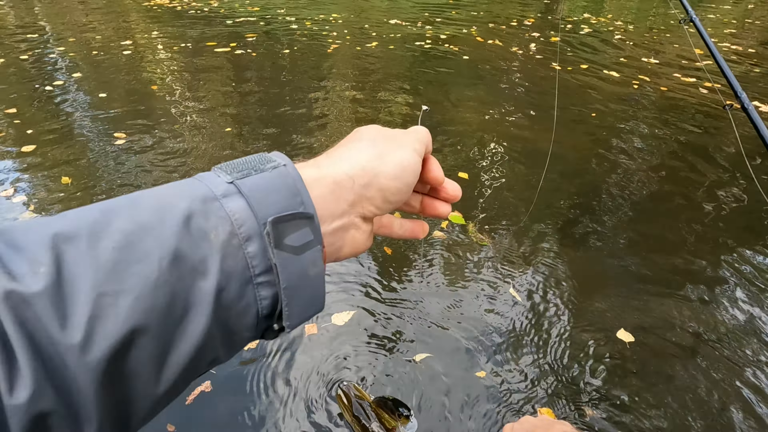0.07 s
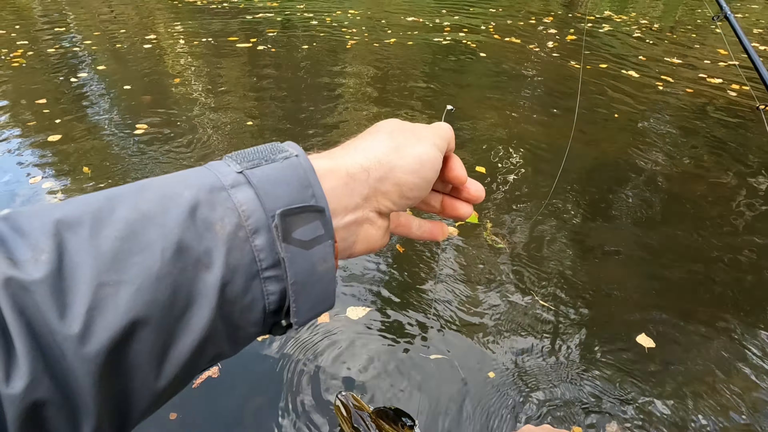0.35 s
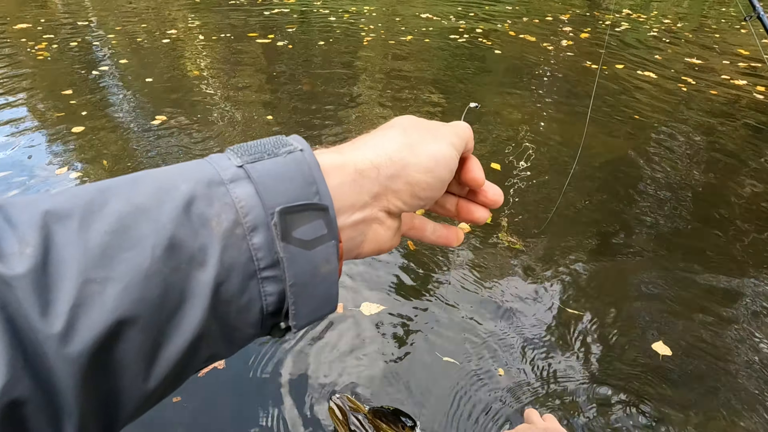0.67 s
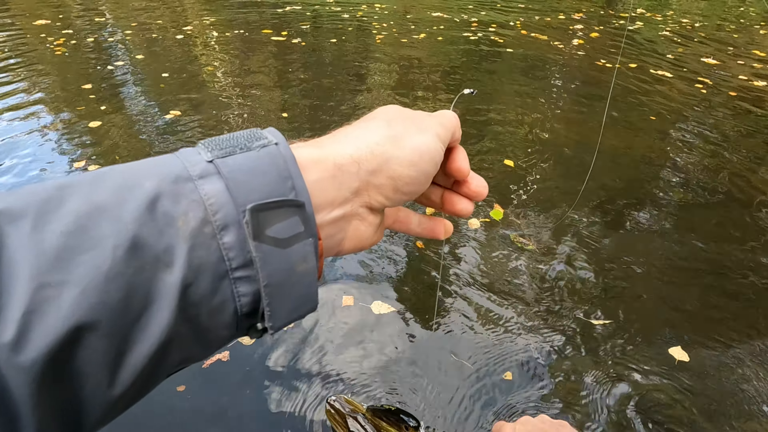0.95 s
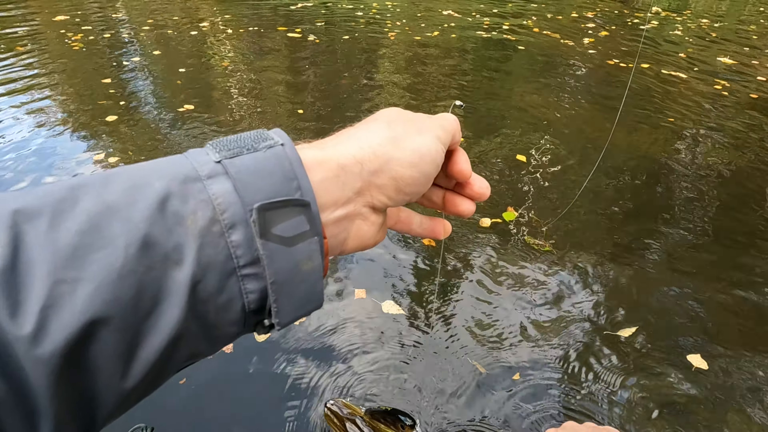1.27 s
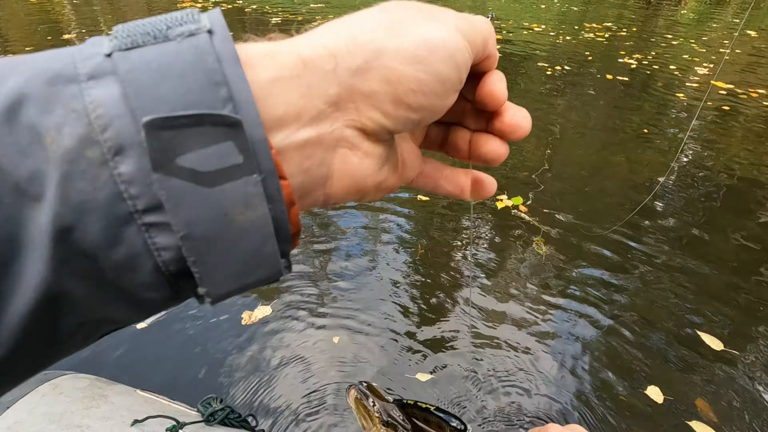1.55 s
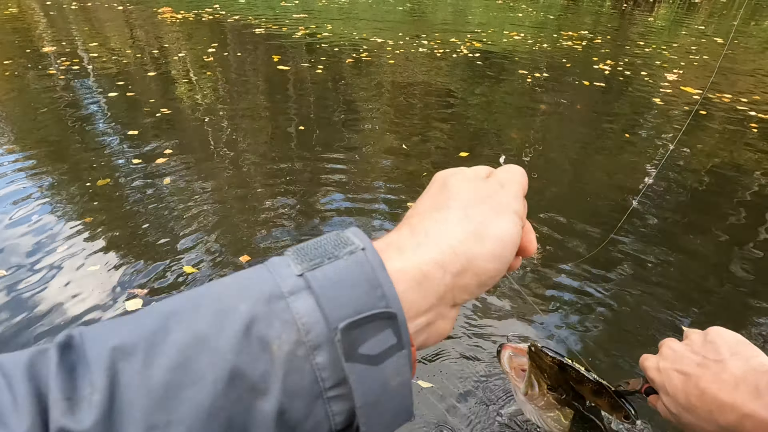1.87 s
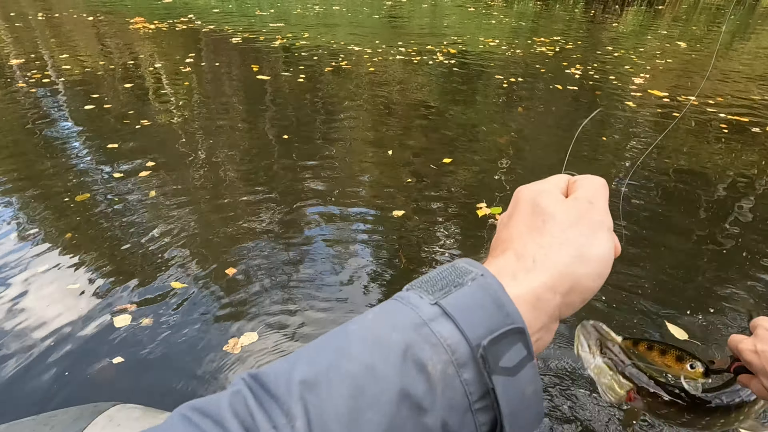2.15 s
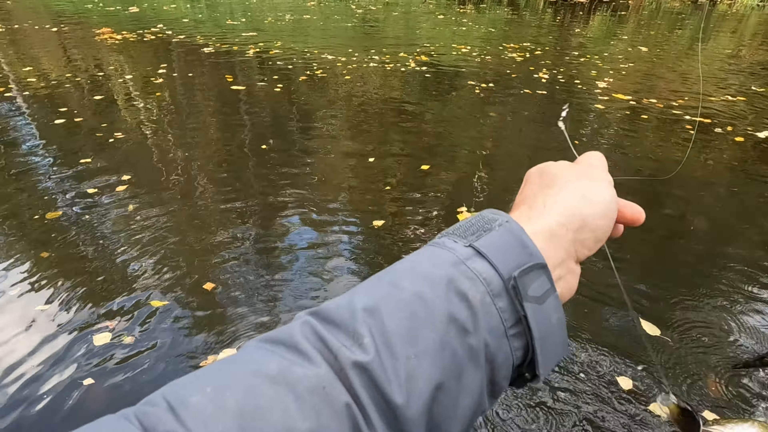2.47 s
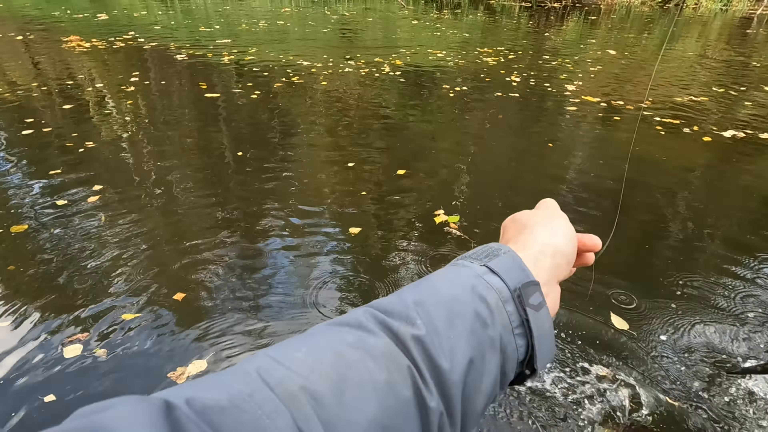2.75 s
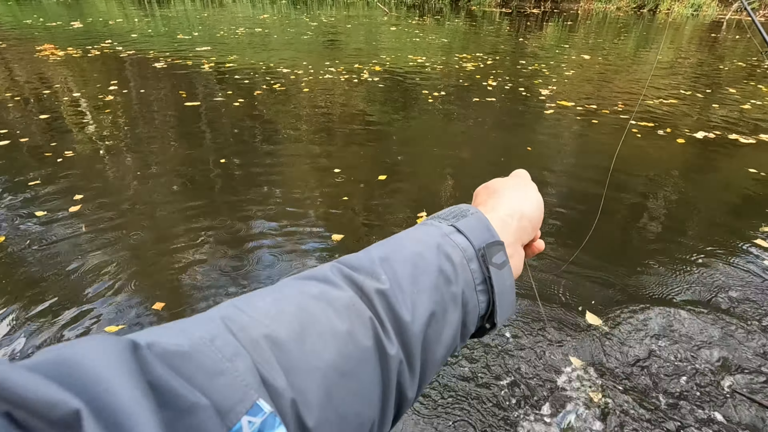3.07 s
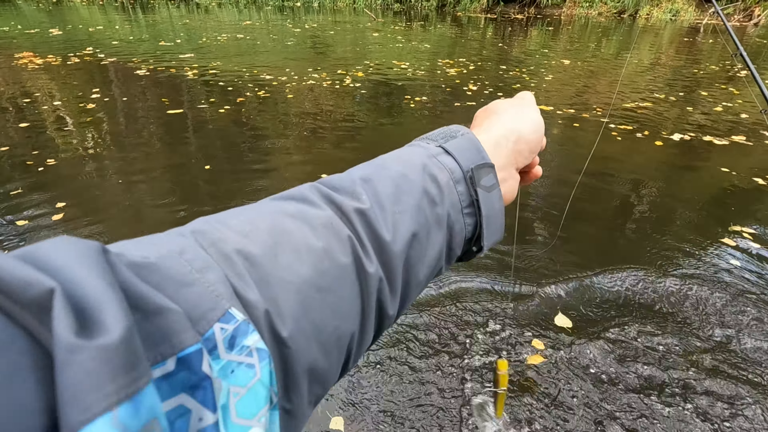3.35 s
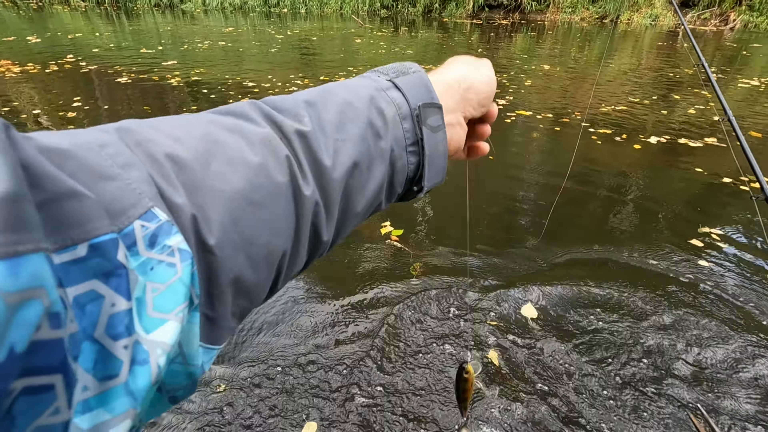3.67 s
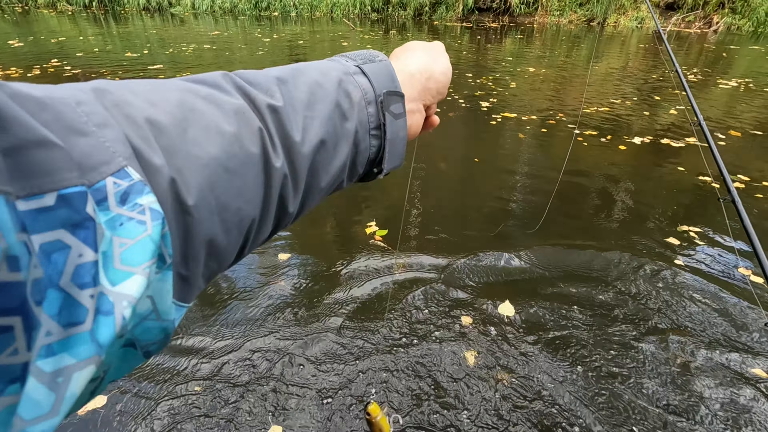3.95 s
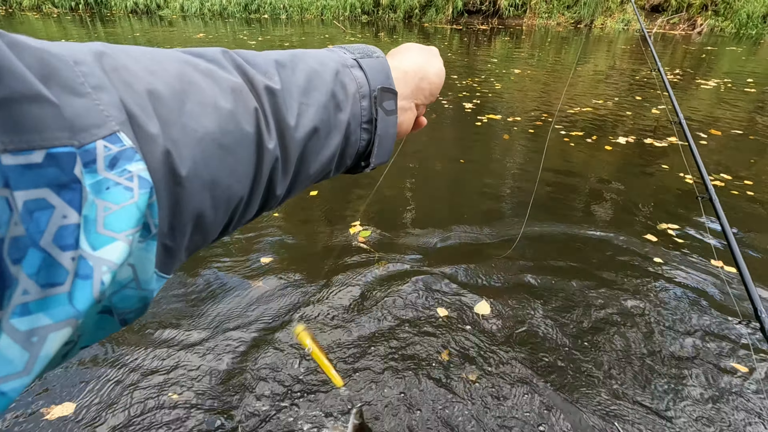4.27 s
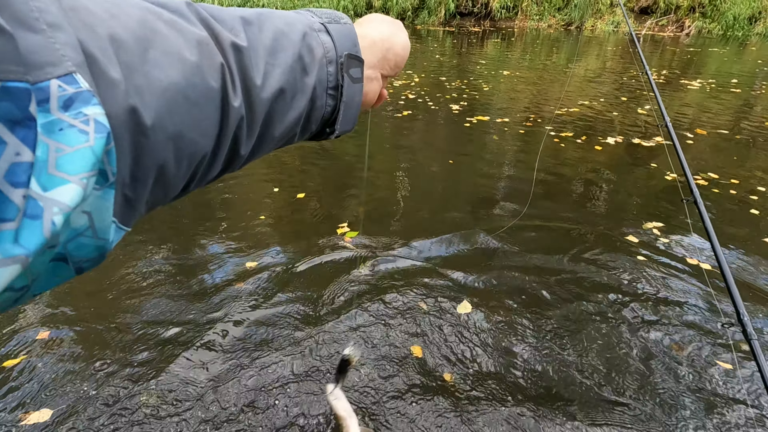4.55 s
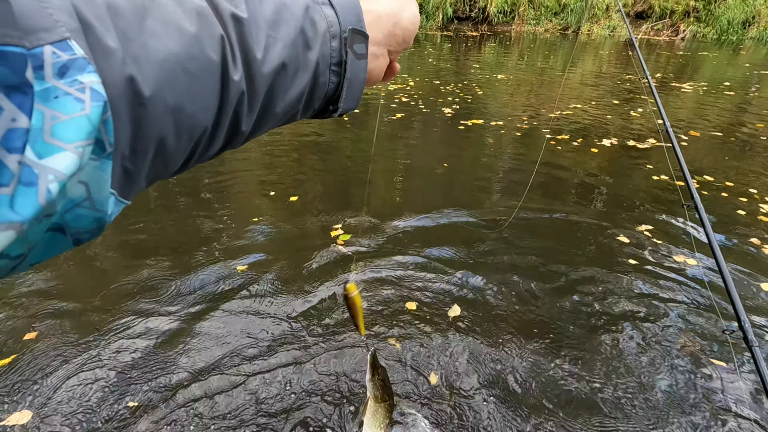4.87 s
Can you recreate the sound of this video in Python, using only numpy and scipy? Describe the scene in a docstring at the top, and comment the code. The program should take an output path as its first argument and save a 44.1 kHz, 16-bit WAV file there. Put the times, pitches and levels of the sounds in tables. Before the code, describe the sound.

Light wind rumbles and puffs on the microphone over a faint hiss on a quiet river. In the first second there are soft rubs of fishing gear and two faint low groans, then a dull knock on an inflatable boat at about 1.4 seconds. From around 2 seconds a small hooked fish thrashes at the surface close by. Its tail and fins flick, slice and slap the water, bubbles plop and gurgle, and spray patters back. More dull knocks on the hull come at about 3.2 and 3.6 seconds. The splashing dies down just after 5 seconds, and a soft swell washes along the boat near 5.8 seconds. A few small flicks return from 6.5 seconds and build into a second bout of splashing from about 7.5 to 8.5 seconds, with a light gust of wind near 8 seconds.

```python
"""First comes light wind rumbling on the microphone, over a faint hiss, soft rubs and a few dull knocks
on an inflatable boat on a quiet river. Then a small hooked fish thrashes at the surface beside it.
Its tail and fins flick, slice and slap the water, trapped air rings as rising bubbles, and spray
patters back. Between the bouts a soft swell washes along the boat."""
import sys
import numpy as np
from scipy import signal
from scipy.fft import rfft, irfft, next_fast_len
from scipy.io import wavfile
from scipy.ndimage import uniform_filter1d

SR = 44100
rng = np.random.default_rng(int(sys.argv[2]) if len(sys.argv) > 2 else 0)


def pcm_store(signal):
    """Save signal as 16-bit PCM."""
    levels = np.round(np.clip(np.atleast_2d(signal), -1, 1) * 32767)
    wavfile.write(sys.argv[1], SR, levels.astype(np.int16).T)


N = 379195
TIME = np.arange(N) / SR
SURGE_HZ = 45  # stirred water comes in uneven surges, up to this fast


def amp(db):
    """Turns decibels into a gain to multiply by."""
    return 10 ** (np.asarray(db) / 20)


def unit(x):
    """Scales a signal to an average strength (rms) of 1."""
    return x / np.sqrt(np.mean(x ** 2) + 1e-20)


def steady(x, span_s):
    """Evens out a signal so that its strength stays near 1."""
    return x / np.sqrt(abs(uniform_filter1d(x ** 2, max(int(span_s * SR), 2))) + 1e-12)


def colour(x, points, power=1):
    """Turns lows and highs up or down along a curve of (frequency [Hz], level [dB]) points."""
    hz, db = np.transpose(points)
    size = next_fast_len(len(x) + 4096)
    gain = amp(power * np.interp(np.log(np.fft.rfftfreq(size, 1 / SR) + 1), np.log(hz), db))
    return irfft(rfft(x, size) * gain, size)[:len(x)]


def band(x, hz, octaves):
    """Keeps only the frequencies around hz."""
    edges = np.clip([hz / 2 ** (octaves / 2), hz * 2 ** (octaves / 2)], [10, 20], [SR * .4, SR * .48])
    return signal.sosfilt(signal.butter(2, edges, "band", fs=SR, output="sos"), x)


def curve(rows):
    """Joins (time [s], level [dB]) points into a gain that changes over time."""
    return amp(np.interp(TIME, *np.transpose(rows)))


def add(mix, s, sound):
    """Mixes a sound in, starting at s seconds."""
    part = mix[..., max(round(s * SR), 0):][..., :sound.shape[-1]]
    part += sound[..., :part.shape[-1]]


def bout(start, length, attack_s=0.0092, release_s=0.046):
    """A gain that swells, holds and dies away."""
    t = TIME - start
    return np.clip(t / attack_s, 0, 1) * np.exp(-np.maximum(t - length, 0) / release_s)


def wander(rate_hz, count=24):
    """A random drift of strength 1, no faster than rate_hz."""
    t = TIME[::200]
    hz = np.geomspace(rate_hz / 10, rate_hz, count)
    waves = np.sin(2 * np.pi * (hz * t[:, None] + rng.random(count)))
    return np.interp(TIME, t, unit(waves.sum(1)))


def puff(hz, octaves, decay_s, attack=0.063):
    """A burst of noise around hz that swells to a strength of about 1 and dies away."""
    t = np.arange(SR // 4) / SR
    fade = (1 - np.exp(-t / (attack * decay_s))) * np.exp(-t / decay_s)
    burst = unit(band(rng.standard_normal(len(t)) * fade, hz, octaves))
    return burst * np.sqrt(np.mean(fade ** 2)) / fade.max()


def bubble(hz, life_s, rise, rough=0, wobble=0.11, damping=1.1):
    """Trapped air rings, gliding by rise octaves as it nears the surface; churned water makes it waver."""
    age = np.arange(0, 1, 1 / max(life_s * SR, 8))
    jitter = unit(uniform_filter1d(rng.standard_normal((2, SR // 8)), size=110))
    bend, flutter = rough * jitter[:, :len(age)]
    turns = np.cumsum(hz * 2 ** (rise * age ** 2) * (1 + wobble * bend)) / SR
    fade = (1 - np.exp(-2 * turns)) * np.exp(-damping * age) * (1 - age ** 4)
    return np.sin(2 * np.pi * turns) * (1 + flutter) * fade


# how the microphone dulls high sounds: (frequency [Hz], level [dB])
MIC_TREBLE = [(7000, 0), (9200, -4.5), (10700, -12.5), (12400, -6.5), (14000, -22.5), (16000, -26)]


def microphone(pair):
    """The microphone softens the treble on both sides."""
    return np.array([colour(side, MIC_TREBLE) for side in pair])


# how wide the sound spreads: (frequency [Hz], scatter level [dB])
STEREO_WIDTH = [(100, -23), (300, -20), (700, -15), (1400, -9.5), (2800, -7.5), (5500, -8.5), (9000, -10.5),
                (13000, -2.5)]
# how much louder the left side is: (frequency [Hz], left minus right [dB])
LEFT_LOUDER = [(200, 0), (1000, -.4), (2300, -1.8), (4600, -1.4), (8500, 1.8), (13000, 4.5)]
# how far the left side runs ahead, negative for behind: (frequency [Hz], phase [radians])
LEFT_AHEAD = [(0, 0), (500, -.05), (1300, -.3), (2600, -.75), (5700, -.2), (12000, 0)]


def mic_openings(pair, size=256):
    """Two close openings hear the same bass but differently scattered treble, the left a bit later."""
    spectra = signal.stft(pair.mean(0), nperseg=size)[2]
    scatter = signal.istft(spectra * np.exp(2j * np.pi * rng.random(spectra.shape)), nperseg=size)[1][:N]
    side = colour(np.sqrt(2) * scatter, STEREO_WIDTH)
    both = np.array([colour(pair[0] + side, LEFT_LOUDER, .5), colour(pair[1] - side, LEFT_LOUDER, -.5)])
    padded = next_fast_len(N)
    lead = np.interp(np.fft.rfftfreq(padded, 1 / SR), *np.transpose(LEFT_AHEAD))
    return irfft(rfft(both, padded) * np.exp(.5j * np.array([lead, -lead])), padded)[:, :N]


def echoes(x, boat_db=-15, boat_s=0.0035, bank_db=-27, bank_s=0.009):
    """Sound bounces quickly off the boat and the water, and faintly off the banks."""
    t = np.arange(SR // 2) / SR
    echo = np.zeros(len(t))
    for db, decay_s in (boat_db, boat_s), (bank_db, bank_s):
        tail = band(rng.standard_normal(len(t)), hz=3740, octaves=5.6) * np.exp(-t / decay_s) * (t > .003)
        echo += amp(db) * tail / np.linalg.norm(tail)
    return signal.oaconvolve(x, echo)[:N]


# tone of the hiss in the opening lull, then afterwards: (frequency [Hz], level [dB])
EARLY_HISS = [(100, -4), (220, 0), (400, -4), (700, -9), (1200, -9), (2200, -13), (5000, -17), (7200, -21),
              (9000, -29), (10700, -34), (12500, -33), (15500, -46)]
LATE_HISS = [(100, 10), (220, 13), (400, 5), (1200, 1.5), (2200, -11), (5000, -1.5), (7200, -10),
             (9000, -76.5), (10700, -57), (12500, -19), (15500, -34)]


def hiss(early_db=-51, late_db=-49):
    """Distant air and river hiss; the sound brightens after the opening lull."""
    blend = np.interp(TIME, [1.535, 1.56], [0, 1])
    early, late = (unit(colour(rng.standard_normal(N), tone)) for tone in (EARLY_HISS, LATE_HISS))
    return (1 - blend) * amp(early_db) * early + blend * amp(late_db) * late


# how hard the wind blows: (time [s], level [dB])
WIND_STRENGTH = [(0, -41), (0.25, -44), (0.38, -27), (1.15, -36), (1.65, -40), (2.1, -35), (2.8, -33.5),
                 (3.7, -41), (4.6, -41), (5.3, -49.5), (5.95, -39.5), (6.7, -49), (7.5, -38), (7.95, -28.5),
                 (8.15, -35), (8.45, -40)]
# tone of its deep rumble and of its higher flapping: (frequency [Hz], level [dB])
RUMBLE_TONE = [(10, 6), (25, 6), (45, -3.5), (70, -11), (110, -22.5), (200, -20), (500, -72)]
FLAP_TONE = [(40, -3), (90, -1), (160, -3.5), (260, -11.5), (450, -9), (1200, -63)]
# single puffs of air: (time [s], level [dB], pitch [Hz], fade time [s])
WIND_PUFFS = [(0.442, -16.5, 51.5, 0.0092), (0.612, -30, 81, 0.023), (1.124, -19.5, 36.4, 0.0088),
              (1.484, -19, 50, 0.022), (1.84, -28, 100, 0.034), (3.566, -17, 72, 0.051),
              (5.92, -30, 95, 0.011), (7.949, -17, 34.4, 0.0086)]


def wind(rumble_db=-3, flap_db=-35, puffs_db=-2, width=0.41, right_db=5, gust_db=4, flap_gust_db=5.5):
    """Uneven swirls of air push on the microphone, rumbling harder on its right side."""
    strength = curve(WIND_STRENGTH)
    shared, side = (steady(colour(z, RUMBLE_TONE), span_s=0.207) for z in rng.standard_normal((2, N)))
    rumble = strength * amp(rumble_db + gust_db * wander(rate_hz=10))
    out = rumble * np.array([shared + width * side, shared - width * side])
    out *= amp([[-right_db / 2], [right_db / 2]])
    # the flapping grows only about half a decibel for each decibel of wind
    flap = strength ** 0.53 * amp(flap_db + flap_gust_db * wander(rate_hz=10))
    out += flap * unit(colour(rng.standard_normal(N), FLAP_TONE))
    for s, db, hz, decay_s in WIND_PUFFS:
        add(out, s, amp(db + puffs_db) * puff(hz, octaves=1.22, decay_s=decay_s))
    return out


# faint rubs of the fishing gear: (start [s], length [s], level [dB])
GEAR_RUBS = [(0, 0.22, -54.5), (0.629, 0.41, -56)]


def rubbing_gear(ticks_per_s=120, whine_hz=7750, climb_hz_per_s=700, whine_db=-8.5, waver=0.0205):
    """Fishing gear rubs with a fine hiss and scattered ticks; the last rub adds a thin, raspy whine."""
    rubs = [amp(db) * bout(start, length) for start, length, db in GEAR_RUBS]
    ticks = rng.standard_normal(N) * (rng.random(N) < ticks_per_s / SR)
    hz = whine_hz + climb_hz_per_s * np.clip(TIME - GEAR_RUBS[-1][0], 0, 1)
    hz *= 1 + waver * unit(uniform_filter1d(rng.standard_normal(N), size=40))
    whine = amp(whine_db) * rubs[-1] * np.sin(2 * np.pi * np.cumsum(hz) / SR)
    scrape = unit(band(rng.standard_normal(N), hz=1740, octaves=4))
    return whine + sum(rubs) * (scrape + 1.15 * unit(band(ticks, hz=1200, octaves=1.5)))


# faint low groans: (start [s], length [s], level [dB], pitch [Hz])
LOW_GROANS = [(.255, 0.098, -40, 208), (.425, 0.11, -44, 215)]


def groans(octave_db=-5, waver=0.051):
    """A low groan, perhaps the rubber hull flexing: a wavering tone and the octave above it."""
    out = np.zeros(N)
    for start, length, db, hz in LOW_GROANS:
        phase = 2 * np.pi * np.cumsum(hz * (1 + waver * wander(rate_hz=56))) / SR
        arch = np.sqrt(abs(np.sin(np.pi * np.clip((TIME - start) / length, 0, 1))))
        out += amp(db) * arch * (np.sin(phase) + amp(octave_db) * np.sin(2 * phase))
    return out


# tone of water sliding along the boat: (frequency [Hz], level [dB])
SWELL_TONE = [(50, -2), (100, -0.5), (260, -3.5), (600, -12), (1400, -14.5), (3500, -26.5)]


def swell(peak_s=5.786, spread_s=0.19, level_db=-40.5, uneven_db=2):
    """A smooth swell of water passes along the hull without breaking."""
    hump = np.exp(-((TIME - peak_s) / spread_s) ** 2 / 2)
    level = hump * amp(level_db + uneven_db * wander(SURGE_HZ))
    return level * unit(colour(rng.standard_normal(N), SWELL_TONE + [(12000, -70)]))


# notes the air-filled hull rings at: (pitch [Hz], level [dB], time to fade by 60 dB [s])
HULL_NOTES = [(88.2, -5, 0.32), (105.6, 3.5, 0.28), (150.6, 3.5, 0.26), (232, 6, 0.094), (254.5, 5, 0.16),
              (328, -0.5, 0.076), (497, -2.5, 0.13), (567, -6.5, 0.18), (775, -29, 0.039), (970, 9, 0.16),
              (1150, 9, .035), (1450, 9, 0.087)]
# blows on the hull: (time [s], level [dB], pitch [Hz])
HULL_KNOCKS = [(0.052, -28, 330), (1.3982, -17, 477), (1.401, -4.5, 200), (1.411, -7.5, 245),
               (1.749, -23.5, 255), (3.187, -8, 350), (3.199, -18, 304), (3.569, -16, 241),
               (3.585, -8.5, 220), (3.606, -7, 138), (3.635, -16.5, 150), (3.673, -16.5, 183)]


def hull_knocks(reach_octaves=0.65, thud_db=-8, ring_db=-1, tick_db=-13, hard_hz=600):
    """A soft blow thuds and rings the hull notes near its own pitch; harder, higher blows also tick."""
    out, t = np.zeros(N), np.arange(SR // 2) / SR
    hz, note_db, ring_s = np.transpose(HULL_NOTES)[:, :, None]
    for s, db, blow_hz in HULL_KNOCKS:
        drive = amp(note_db) / (1 + (np.log2(hz / blow_hz) / reach_octaves) ** 2)
        notes = drive * np.sin(2 * np.pi * hz * t) * np.exp(-np.log(1000) * t / ring_s)
        ring = notes[::2].sum(0) - notes[1::2].sum(0)  # neighbouring notes start in opposite directions
        add(out, s, amp(db + ring_db) * ring / np.linalg.norm(drive) / 2)
        add(out, s, amp(db + thud_db) * puff(blow_hz, octaves=1.47, decay_s=0.0059))
        hardness = (blow_hz / hard_hz) ** 4
        add(out, s, amp(db + tick_db) * hardness * puff(hz=6000, octaves=2.6, decay_s=0.0009))
    return out


def swarm(level, lo_hz, hi_hz, per_s, cycles, spread_db, wash, db_per_octave, count=40):
    """Gently stirred water is a smooth wash; once it breaks, small bubbles of uneven size take over."""
    pops = np.zeros(N)
    for hz in np.geomspace(lo_hz, hi_hz, count):
        pop = bubble(hz, life_s=cycles * rng.uniform(0.26, 0.8) / hz, rise=rng.uniform(0, 0.19))
        born = rng.random(N) < per_s / count / SR
        size = amp(spread_db * np.minimum(rng.exponential(1, N), 4)) * rng.choice([-1, 1], N)
        gain = np.sqrt(hz) * amp(db_per_octave * np.log2(hz / lo_hz))
        pops += gain * signal.oaconvolve(born * size, pop)[:N]
    noise = band(rng.standard_normal(N), np.sqrt(lo_hz * hi_hz), np.log2(hi_hz / lo_hz))
    broken = level ** 2 / (level ** 2 + amp(-43) ** 2)  # the water breaks at around -43 dB
    surges = amp(1.6 * wander(SURGE_HZ))
    return level * steady(broken * unit(pops) + wash * unit(noise), span_s=0.071) * surges


# ripples lapping between the bouts: (time [s], level [dB])
LAPPING = [(1.5, -56), (1.85, -47.5), (2.4, -46.5), (3.2, -43), (4.0, -48), (4.8, -42.5), (5.5, -51),
           (6.2, -52.5), (7.0, -53.5), (7.6, -46.5), (8.2, -44), (8.6, -46.5)]
# bouts of thrashing: (start [s], length [s], level [dB], brightness [dB])
# brightness below 0 is deep churning, above 0 shallow spraying
THRASH_BOUTS = [(1.797, 0.18, -49, -5.5), (2.011, 0.11, -43.5, -5.5), (2.565, 0.065, -37.5, 1),
                (2.693, 0.03, -31, 0), (2.788, 0.16, -37, 9), (2.965, 0.14, -35, 3),
                (3.195, 0.046, -36, 1.5), (3.526, 0.065, -40, 7.5), (3.676, 0.091, -46.5, 13),
                (3.85, 0.016, -48, 11), (4.079, 0.17, -51, 17), (4.24, 0.15, -59, 16),
                (4.391, 0.1, -38, 7.5), (4.587, 0.099, -41, 5), (4.75, 0.14, -53, 2),
                (5.034, 0.054, -46.5, 15.5), (7.125, 0.027, -55, 19.5), (7.68, 0.022, -49, 8),
                (8.046, 0.09, -37.5, -1.5), (8.15, 0.095, -36, 0), (8.431, 0.081, -41, 9.5)]
# tone of the falling spray: (frequency [Hz], level [dB])
SPRAY_TONE = [(2500, -23), (3700, -14), (5200, -8), (7200, -7.5), (9000, -8.5), (12500, -6), (16000, 0)]


def stirred_water(gurgle_db=-2, splash_db=3, spray_db=-1, fizz_db=3):
    """Ripples and thrashing make gurgling bubbles, finer splashing and a crackle of falling spray."""
    ripples = curve(LAPPING) * np.clip((TIME - 1.54) / .06, 0, 1)  # silent until 1.54 s
    power = (amp([[-4.5], [-1], [2.5]]) * ripples) ** 2  # rows: gurgle, splash, spray
    for start, length, db, bright_db in THRASH_BOUTS:
        gains = amp([[db + gurgle_db - bright_db], [db + splash_db], [db + spray_db + bright_db]])
        power += (gains * bout(start, length)) ** 2
    gurgle, splash, spray = np.sqrt(power)
    low = swarm(gurgle, 240, 900, per_s=260, cycles=9, spread_db=3.2, wash=.38, db_per_octave=1)
    mid = swarm(splash, 900, 3500, per_s=1200, cycles=15, spread_db=3.7, wash=.32, db_per_octave=-2.2)
    high = swarm(spray, 3400, 14500, per_s=1400, cycles=14, spread_db=4.3, wash=.36, db_per_octave=-.7)
    return low + mid + amp(fizz_db) * colour(high, SPRAY_TONE)


# single big bubbles: (time [s], level [dB], first pitch [Hz], rise [octaves], life [s], roughness [0-1])
BIG_BUBBLES = [(1.925, -23.5, 2720, 0.2, 0.0046, 0), (2.007, -13.5, 330, -4, 0.0044, 0.06),
               (2.051, -21.5, 880, 0.5, 0.023, 0), (2.065, -17.5, 415, 1.6, 0.06, 0.08),
               (2.694, -19, 1530, -1, 0.012, 0.13), (2.701, -16, 1137, 0.5, 0.022, 0.27),
               (2.703, -15.5, 470, 1, 0.009, 0.1), (2.7145, -9.5, 460, 1.5, 0.012, 0.15),
               (2.729, -16.5, 940, 0, 0.017, 0.1), (2.735, -20, 1890, 1.3, 0.013, 0.54),
               (2.744, -28.5, 357, 0.2, 0.036, 0.4), (3.007, -24, 2520, 2, 0.011, 0.38),
               (3.025, -29, 874, -1, 0.026, 0), (3.046, -24, 1057, 0.1, 0.034, 0.46),
               (3.127, -27.5, 2090, 0.5, 0.026, .7), (3.297, -32, 1157, 0.7, 0.04, 0.86),
               (3.566, -11.5, 192, 2.15, 0.035, 0.3), (3.672, -28.5, 1410, 1.8, 0.016, 0.24),
               (3.850, -34.5, 1072, -0.3, 0.027, 0.6), (3.895, -31.5, 2090, 1.5, 0.026, 0.67),
               (4.158, -24, 330, -3, 0.0061, 0.3), (4.276, -36, 836, 0.5, 0.037, 0.8),
               (4.307, -30.5, 1850, 0, 0.015, 0.78), (4.394, -16.5, 800, -0.1, 0.0083, 0.03),
               (4.452, -25, 1510, 0, 0.016, 0.4), (4.506, -26.5, 395, -4, 0.032, 0.64),
               (4.5545, -23, 1420, -0.2, 0.0072, 0), (4.624, -26.5, 332, -0.09, 0.013, 0.4),
               (4.64, -23.5, 900, 0.2, 0.011, 0.3), (4.662, -15, 957, -0.1, 0.015, 0.6),
               (4.722, -25.5, 190, 0.7, 0.019, 0.54), (4.759, -26, 342, 0, 0.015, 0.54),
               (4.774, -29, 960, -1, 0.02, 0), (4.785, -31, 750, -0.7, 0.023, 0.2),
               (4.786, -29, 1744, 0, 0.019, 0.4), (4.795, -35, 329, 0.7, 0.05, 0.3),
               (4.843, -33.5, 401, 1.2, 0.05, 0.4), (4.872, -40.5, 683, 1, 0.033, 0.6),
               (4.95, -21.5, 1670, 0.6, 0.011, 0.04), (4.965, -33, 795, 3.5, 0.024, 0.3),
               (5.043, -27, 1040, -0.3, 0.021, 0.4), (5.055, -30, 720, 1.5, 0.031, 0.4),
               (5.185, -47, 790, 0, 0.037, .8), (5.29, -39.5, 540, 0, 0.052, 0.6),
               (8.021, -28.5, 930, 6, 0.05, 0.55), (8.067, -22.5, 588, -0.3, 0.024, 0.65),
               (8.152, -26, 734, -1.7, 0.024, 0.5), (8.167, -19.5, 375, 0, 0.017, 0.2),
               (8.2, -26, 965, 0, 0.0113, 0.27), (8.233, -17.5, 2550, -1, 0.0048, 0.26),
               (8.248, -22, 1596, 3.5, 0.015, 0), (8.236, -30, 348, 0.8, 0.089, 0.54),
               (8.31, -34, 576, 0.8, 0.052, 0.9), (8.457, -29, 966, -0.3, 0.022, 0.1),
               (8.494, -32.5, 1134, 2.5, 0.028, 0.7), (8.538, -28, 1136, 2.8, 0.021, 0.6)]


def big_bubbles(splat_db=-13):
    """Plops and glugs: each bubble pinches off with a small splat, then rings."""
    out = np.zeros(N)
    for s, db, hz, rise, life_s, rough in BIG_BUBBLES:
        add(out, s, amp(db) * bubble(hz, life_s, rise, rough))
        add(out, s, amp(db + splat_db) * puff(2 * hz, octaves=3.7, decay_s=0.00063))
    return out


# slaps of the fish on the water: (time [s], level [dB], pitch [Hz], fade time [s])
BODY_SLAPS = [(2.004, -14.5, 985, 0.0011), (2.015, -26, 1100, 0.0032), (2.05, -21.5, 1180, 0.0044),
              (2.057, -33, 2200, .002), (2.1695, -10.5, 1220, 0.00046), (2.172, -24.5, 970, 0.0046),
              (2.284, -24.5, 2270, 0.00069), (2.565, -18, 1130, 0.0028), (2.603, -33, 890, 0.02),
              (2.697, -26, 990, 0.036), (3.187, -23, 885, 0.014), (3.537, -21.5, 464, 0.0047),
              (3.551, -24, 198, 0.017), (3.568, -17.5, 660, 0.013), (4.383, -28, 1400, 0.024),
              (4.6614, -15.5, 960, 0.0013), (4.684, -32, 1350, 0.0061), (4.713, -22, 900, 0.0014),
              (5.2328, -24, 2620, 0.0026), (7.774, -18.5, 2750, 0.004), (7.872, -9.5, 3780, 0.00068),
              (8.075, -29, 2480, 0.032), (8.148, -24.5, 700, 0.032), (8.176, -21, 1700, 0.0074),
              (8.198, -22, 550, 0.0091)]


def body_slaps(octaves=1.64, spatter_db=-16):
    """The body hits the water and leaves a hollow that collapses, with a thin spatter on top."""
    out = np.zeros(N)
    for s, db, hz, decay_s in BODY_SLAPS:
        add(out, s, amp(db) * puff(hz, octaves, decay_s))
        add(out, s, amp(db + spatter_db) * puff(hz=3600, octaves=5.1, decay_s=decay_s))
    return out


# fins slicing the water: (start [s], length [s], level [dB], pitch [Hz])
FIN_SWISHES = [(2.51, 0.044, -38.5, 6300), (2.899, 0.026, -34.5, 4500), (2.985, 0.014, -30.5, 7340),
               (4.117, 0.023, -37, 6650), (4.159, 0.032, -39, 7500), (4.467, 0.049, -36.5, 7000),
               (4.682, 0.033, -33.5, 6900), (7.539, 0.019, -39.5, 6040), (7.679, 0.042, -43, 4970),
               (7.771, 0.009, -40, 4800), (7.809, 0.049, -33, 4600), (7.859, 0.026, -42, 5130),
               (8.075, 0.051, -37, 4500), (8.174, 0.078, -38.5, 4350), (8.431, 0.03, -28.5, 5850),
               (8.498, 0.012, -29.5, 5900)]


def fin_swishes(octaves=0.77, rise_s=0.0015, release_s=0.0012, pops_per_s=2500, sheen_db=-13):
    """A fin slices the surface: a short, dense sizzle of tiny bubbles of nearly one size."""
    out, t = np.zeros(N), np.arange(SR // 6) / SR
    for s, length, db, hz in FIN_SWISHES:
        pops = rng.standard_normal(len(t)) * (rng.random(len(t)) < pops_per_s / SR)
        sizzle = unit(band(pops, hz, octaves)) + amp(sheen_db) * unit(band(pops, hz=11100, octaves=0.13))
        fade = np.minimum(t / rise_s, 1) * np.exp(-np.maximum(t - length, 0) / release_s)
        add(out, s, amp(db) * sizzle * fade)
    return out


# sharp flicks of the tail and fins: (time [s], level [dB], pitch [Hz], fade time of the crack [s])
TAIL_FLICKS = [(0.6462, -29, 4940, 0.00033), (0.8166, -31, 5490, 0.00049), (1.954, -21, 7210, 0.00033),
               (2.0047, -14, 2710, 0.0014), (2.1692, -13.5, 2650, 0.00046), (2.1703, -11.5, 4800, 0.00037),
               (2.1936, -23, 6500, 0.00075), (2.2095, -27, 5400, 0.0005), (2.217, -9, 5150, 0.0007),
               (2.2305, -13.5, 5700, 0.00093), (2.3346, -18.5, 6010, 0.00039), (2.3931, -20, 2640, 0.00077),
               (2.5266, -9, 4250, 0.0013), (2.566, -13, 6860, 0.0017), (2.6215, -19, 7700, 0.0011),
               (2.693, -14.5, 5730, 0.0016), (2.784, -9.5, 7500, 0.0015), (2.797, -17.5, 2000, 0.0015),
               (2.8086, -10, 6000, 0.00046), (2.818, -19, 3530, 0.002), (2.8505, -19, 2010, 0.0006),
               (2.928, -19, 5570, 0.00079), (2.9336, -12, 9150, 0.00047), (2.956, -16, 2850, 0.00098),
               (2.994, -17, 6040, 0.0017), (3.0832, -22.5, 6950, 0.00064), (3.249, -21, 5650, 0.002),
               (3.3007, -13, 7600, 0.0003), (3.3175, -8, 9400, 0.00014), (3.5164, -10.5, 9300, 0.0015),
               (3.559, -12, 3120, 0.0013), (3.6577, -16, 9060, 0.0013), (3.6988, -14.5, 7400, 0.0014),
               (3.705, -18, 6700, 0.0004), (3.7072, -7, 8370, 0.00019), (3.782, -22, 2560, 0.0026),
               (3.8746, -12.5, 7500, 0.00068), (4.024, -23, 7800, 0.0016), (4.0974, -20, 7000, 0.00067),
               (4.1162, -12, 6940, 0.00095), (4.127, -10.5, 6600, 0.00069), (4.1664, -8, 7640, 0.00048),
               (4.169, -9, 9000, 0.0011), (4.1798, -10, 5900, 0.0003), (4.3228, -22, 8750, 0.0004),
               (4.3536, -13.5, 7400, 0.0016), (4.4545, -28, 1980, 0.00035), (4.4732, -14, 5660, 0.0012),
               (4.503, -7, 9500, 0.0008), (4.5072, -11, 7150, 0.00052), (4.5698, -12, 6200, 0.0012),
               (4.6, -22, 6870, 0.001), (4.607, -15.5, 8960, 0.00065), (4.697, -17, 6960, 0.00023),
               (4.7056, -10, 7170, 0.00027), (4.81, -25.5, 5900, 0.0045), (5.0122, -13.5, 7330, 0.0005),
               (5.0148, -13.5, 8060, 0.00075), (5.0422, -22, 3100, 0.001), (5.0662, -21, 7400, 0.0012),
               (5.0846, -17.5, 2900, 0.00055), (5.2342, -15.5, 4840, 0.00027), (5.369, -18.5, 7450, 0.0019),
               (6.5315, -22, 4800, 0.0013), (6.6127, -32, 5400, 0.002), (6.893, -28, 8500, 0.0012),
               (7.1242, -22.5, 5860, 0.0011), (7.1337, -25, 5700, 0.0006), (7.369, -29, 5940, 0.0016),
               (7.3969, -29, 1930, 0.0015), (7.3974, -22, 5370, 0.0016), (7.443, -29, 6000, 0.0019),
               (7.4337, -24, 5800, 0.0011), (7.4666, -21.5, 5940, 0.00071), (7.499, -25, 5660, 0.0005),
               (7.5146, -11, 9700, 0.00088), (7.531, -21, 5960, 0.00043), (7.585, -18.5, 3630, 0.00042),
               (7.6156, -29, 6070, 0.0006), (7.7035, -21, 9200, 0.00066), (7.715, -23, 6800, 0.002),
               (7.7724, -11.0, 5080, 0.00051), (7.7795, -8.5, 5200, 0.00052), (7.8102, -19, 4670, 0.0008),
               (7.825, -6.5, 9300, 0.00039), (7.8714, -15.5, 5400, 0.0004), (7.9097, -20.5, 5210, 0.0011),
               (7.955, -18, 5540, 0.0021), (7.9986, -20, 7700, 0.0031), (8.037, -22, 3120, 0.0031),
               (8.0818, -14, 2800, 0.0024), (8.1809, -13.5, 2690, 0.0021), (8.1988, -11.5, 2470, 0.00059),
               (8.354, -23, 4160, 0.00027), (8.4276, -17.5, 5300, 0.0016)]


def tail_flicks(click_db=-5, ping_db=-8.5, crack_db=-9, snap_db=-21, body_db=-31, right_db=1.5,
                break_db=-22, drops_db=-13, patter_db=-19):
    """Each flick breaks the surface softly, then clicks, cracks, pings a tiny bubble and throws drops."""
    out, t = np.zeros(N), np.arange(SR // 4) / SR
    for s, db, hz, fade_s in TAIL_FLICKS:
        click_age, ping_age = hz * t / 0.94, t / .0006  # loudest after 0.94 cycles and after 0.6 ms
        click = amp(click_db) * click_age * np.exp(1 - click_age)
        ping = amp(ping_db) * ping_age * np.exp(1 - ping_age)
        ring = (click + ping) * np.sin(2 * np.pi * hz * t)
        crack = amp(crack_db) * puff(hz, octaves=2.02, decay_s=fade_s, attack=0.52)
        snap = amp(snap_db) * puff(hz=10800, octaves=10.6, decay_s=fade_s, attack=1)
        body = amp(body_db) * puff(hz=1740, octaves=2.3, decay_s=0.0037)
        add(out, s, amp(db) * (ring + crack + snap + body))
        # the fin breaks the surface 4 ms before the flick
        add(out, s - .004, amp(db + break_db) * puff(hz, octaves=2, decay_s=.002, attack=1))
        wet = np.sqrt(fade_s / .002)  # longer, wetter flicks throw louder drops
        for delay, ratio in zip(rng.exponential(0.0022, size=3), rng.uniform(0.67, 1.426, size=3)):
            add(out, s + delay, wet * amp(db + drops_db) * bubble(hz * ratio, life_s=.002, rise=.1))
        # two drops patter back, on average 10 ms later
        for delay, drop_hz in zip(rng.exponential(0.01, size=2), rng.uniform(2550, 14400, size=2)):
            patter = puff(drop_hz, octaves=0.5, decay_s=0.0011, attack=2)
            add(out, s + delay, wet * amp(db + patter_db) * patter)
    return out * amp([[-right_db / 2], [right_db / 2]])


def scene():
    """The fish, water and boat close by, with their echoes, and hiss and wind around them."""
    near = tail_flicks() + fin_swishes() + body_slaps() + big_bubbles()
    near += hull_knocks() + groans() + stirred_water() + swell() + rubbing_gear()
    near += echoes(near.mean(0))
    return mic_openings(microphone(near) + hiss()) + wind()


def record(dry):
    """Cuts away the very highest treble, above 16200 Hz."""
    low_pass = signal.firwin(511, 16200, window=("kaiser", 9), fs=SR)
    return signal.oaconvolve(dry, low_pass[None], "same")


dry = scene()
out = record(dry)
pcm_store(out)
```